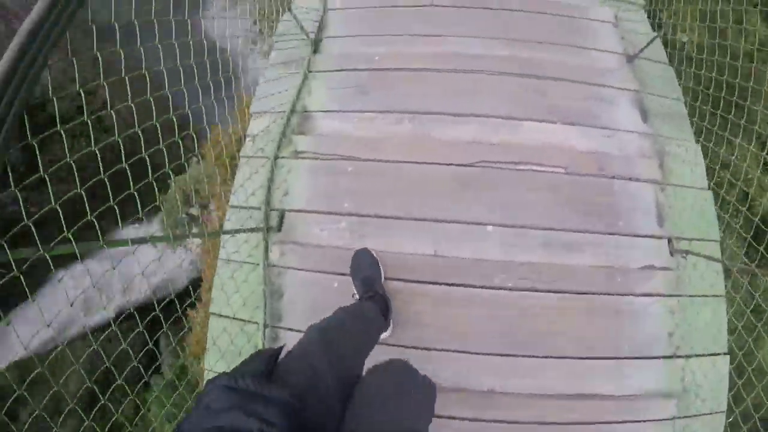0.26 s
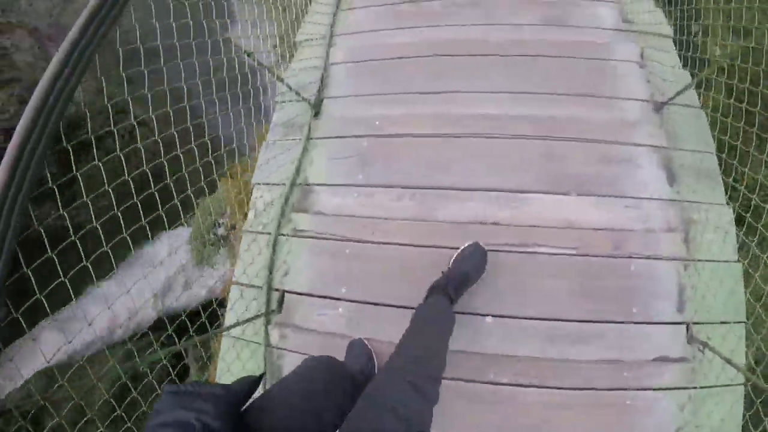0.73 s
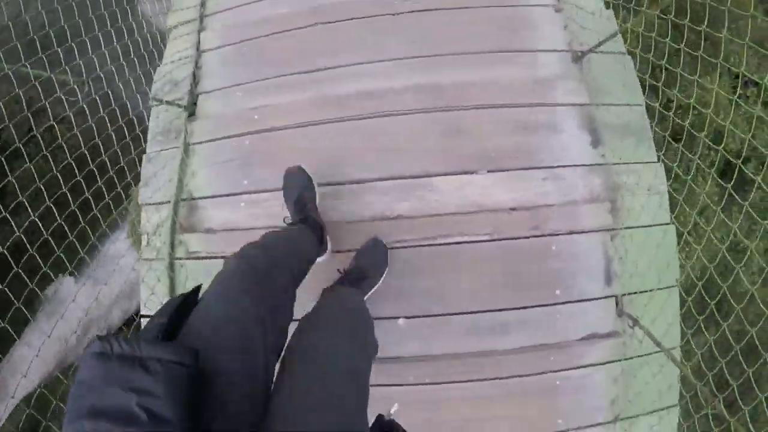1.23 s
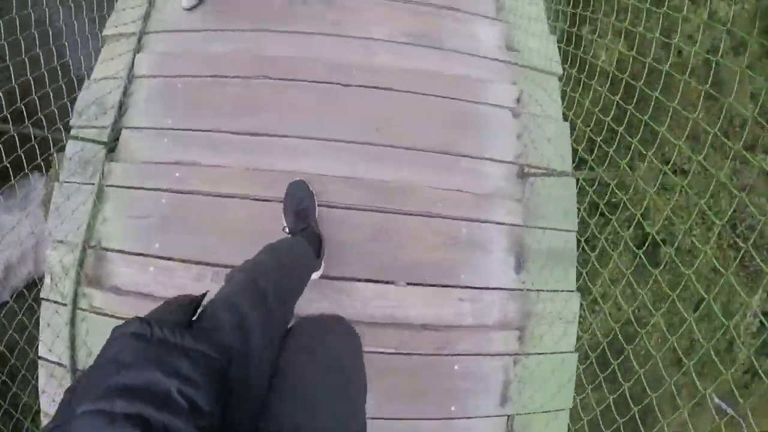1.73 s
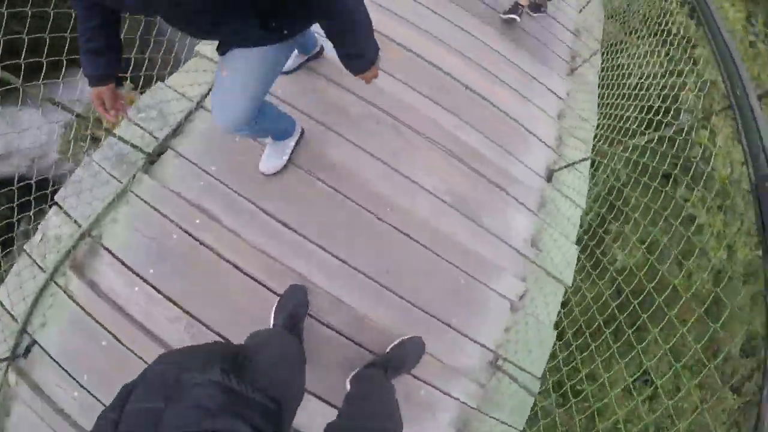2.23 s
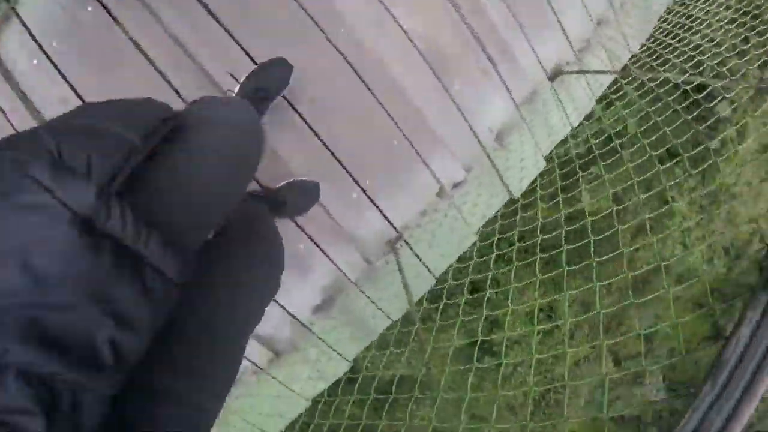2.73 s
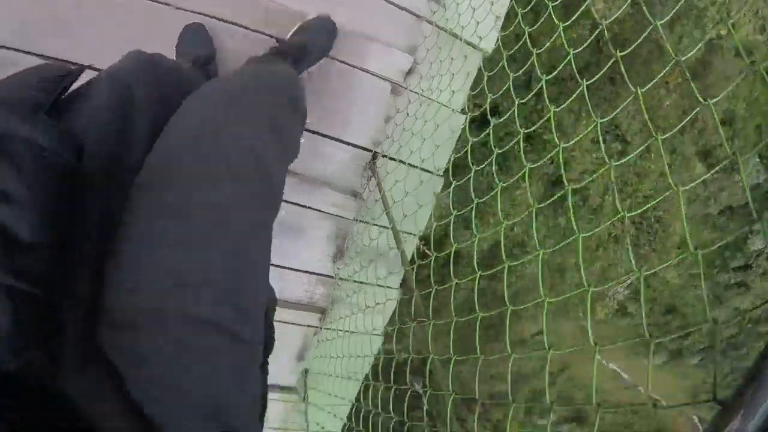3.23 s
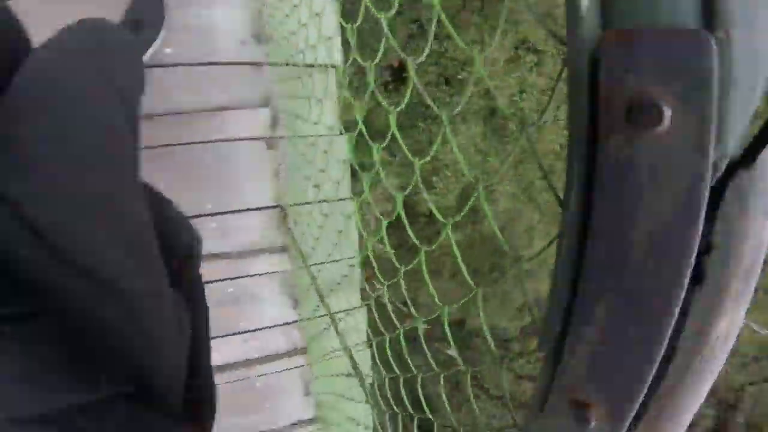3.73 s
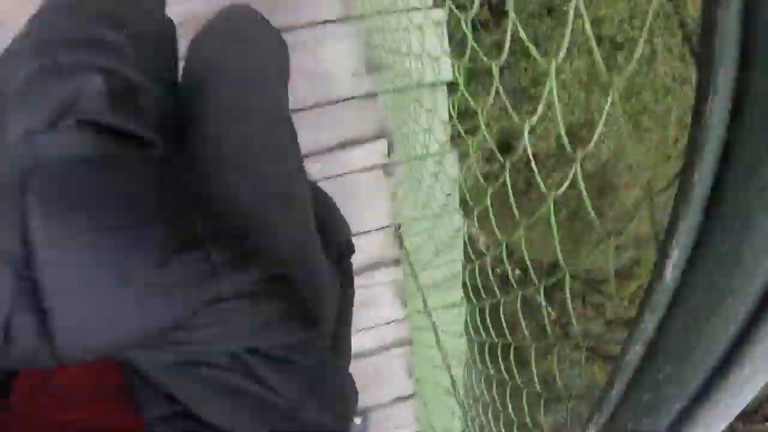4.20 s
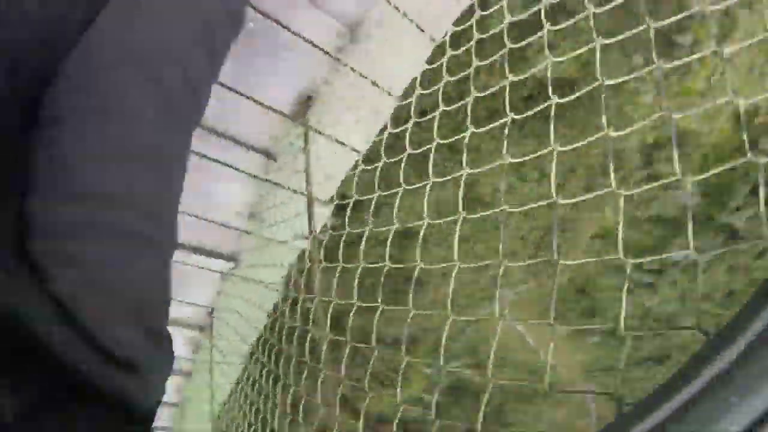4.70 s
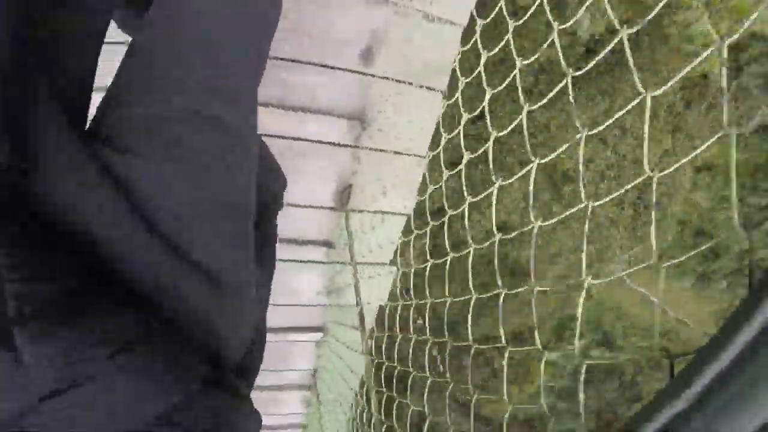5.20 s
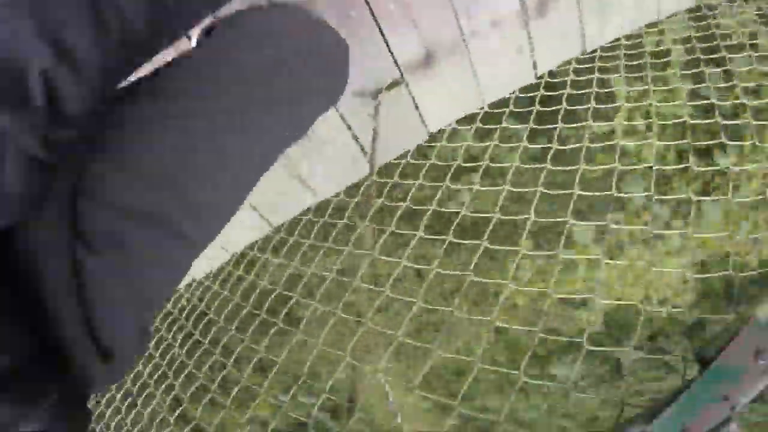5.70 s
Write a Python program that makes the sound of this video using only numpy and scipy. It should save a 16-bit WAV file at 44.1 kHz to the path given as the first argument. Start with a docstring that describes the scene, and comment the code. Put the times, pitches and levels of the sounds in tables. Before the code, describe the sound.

A mono, muffled perspective from inside a small sealed camera housing outdoors, high above a gorge. From 0 to 2 seconds there is only a soft, smooth, distant river rush with a boxy colour, over lumpy low wind and cloth rumble; a very faint tone slides upward at about 1.4. At 2.1 a dull bump begins the handling noise. Knocks gather from 2.2, and at 2.35 a loud plastic crack and heavy low thump overload the input, the background dipping afterwards. More clacks, thuds and short cloth scrapes follow until 2.9, then a bright, sharp knock at 3.35. After a sparser stretch, knocks resume at 3.8 to 4.0, with a huge, deep, slow-building thump near 4.4. Another hard clack and boom lands at 4.94, then a tiny rising squeak at 5.07. Low gusts, thuds and rattling knocks cluster from 5.4 to 5.7, with a strong bump at 5.65, and lighter taps end it.

```python
"""On a plank bridge high over a gorge, a small camera in a sealed housing swings against a padded jacket.
The far river and the wind reach the microphone through the housing, as coloured noise.
Bumps swing the housing at a few tens of hertz; knocks and dragging cloth ring its shell modes.
Faint tones slide upward, hard plastic parts snap, and the hardest bumps overload the input."""
import sys
import numpy as np
from scipy import signal
from scipy.io import wavfile
from scipy.ndimage import uniform_filter1d

SR = 44100
rng = np.random.default_rng(int(sys.argv[2]) if len(sys.argv) > 2 else 0)


def store_wav(level_fs):
    """Save 16-bit WAV to argv[1]."""
    pcm = np.round(np.clip(np.atleast_2d(level_fs), -1, 1) * 32767)
    wavfile.write(sys.argv[1], SR, pcm.T.astype(np.int16))


N = 262395  # samples


def gain_of(db):
    """Amplitude factor for a level in dB."""
    return 10 ** (np.asarray(db) / 20)


def evened(x):
    """Scale to an RMS of one."""
    return x / np.sqrt(np.mean(x ** 2) + 1e-20)


def read(points, hz):
    """Read a spectrum in dB, with straight lines over log frequency."""
    point_hz, point_db = np.transpose(points)
    return np.interp(np.log(hz + 1), np.log(point_hz + 1), point_db)


def along(curve):
    """Draw a curve of (seconds, value) points out over every sample."""
    s, value = np.transpose(curve)
    return np.interp(np.arange(N) / SR, s, value)


def add(mix, s, sound):
    """Lay a sound into the mix at s seconds, cut off at the end."""
    part = mix[round(s * SR):][:len(sound)]
    part += sound[:len(part)]


def noise(colour, size, patchy_db):
    """Random short-time spectra of a given colour, with drifting patches, at an RMS of one."""
    hz = np.fft.rfftfreq(size, 1 / SR)
    real, imaginary, patches = rng.standard_normal((4 * N // size + 5, len(hz), 3)).T
    patches = uniform_filter1d(patches, size=12, axis=0)  # smooth over frequency
    patches = evened(uniform_filter1d(patches, size=14, axis=1))  # smooth over time
    level_db = colour(hz)[:, None] + patchy_db * patches
    spectra = (real + 1j * imaginary) * gain_of(level_db)
    _, sound = signal.istft(spectra, nperseg=size, noverlap=3 * size // 4)
    return evened(sound[:N])


# The river as the camera turns and is covered by the jacket.
# Each point: time in seconds, level in dB.
RIVER_LEVEL = [(0, -46), (1.0, -46.5), (1.4, -47), (1.8, -48), (2.6, -47), (2.95, -46.5), (3.9, -50.5),
               (4.24, -49.5), (4.52, -46.5), (5.5, -48), (5.77, -45.5), (5.95, -47.5)]
# Colour of the distant rush. Each point: frequency in Hz, relative density in dB per Hz.
RUSH_COLOUR = [(59, -13.5), (100, 2.5), (314, -2.5), (385, -5), (855, -10.5), (1260, -10), (2060, -12.5),
               (2280, -5), (2530, -13), (3650, -10), (4050, -19), (5170, -23.5), (6090, -18), (7170, -27.5),
               (13200, -45)]
# Air resonances of the housing. Each row: centre in Hz, width in Hz, lift in dB.
HOUSING_RESONANCES = [(1249, 116, 5.5), (1890, 59, 4.5), (2120, 200, 1.5), (3780, 32, 10.5), (6066, 280, 6)]


def river():
    """Distant smooth rush, lifted at the air resonances of the housing."""
    def colour(hz):
        lift_db = sum(db / (1 + (2 * (hz - f) / width) ** 2) for f, width, db in HOUSING_RESONANCES)
        return read(RUSH_COLOUR, hz) + lift_db
    return gain_of(along(RIVER_LEVEL)) * noise(colour, size=1024, patchy_db=0.8)


# Wind and cloth rubbing on the housing.
# Each point: time in seconds, level in dB before the gusts.
RUMBLE_LEVEL = [(0.0, -35), (1.19, -38.5), (2.0, -32.5), (2.9, -33), (3.33, -42.5), (3.61, -40.5),
                (3.8, -27), (4.1, -38), (4.3, -29.5), (4.82, -27), (5.05, -39), (5.32, -39), (5.52, -23.5),
                (5.63, -41), (5.95, -22)]
# Colour of the rumble. Each point: frequency in Hz, relative density in dB per Hz.
RUMBLE_COLOUR = [(7, -27), (13, 4), (24, -5.5), (70, -12.5), (110, -29), (190, -36), (400, -89)]


def rumble():
    """Wind and rubbing cloth: lumpy low noise that comes in short gusts."""
    gusts = uniform_filter1d(rng.standard_normal(N), size=1500)
    gusts_db = 1.8 * evened(uniform_filter1d(gusts, size=1500))
    lumps = noise(lambda hz: read(RUMBLE_COLOUR, hz), size=8192, patchy_db=5.5)
    return gain_of(along(RUMBLE_LEVEL) + gusts_db) * lumps


# Faint rising tones. Each row: start in seconds, length in seconds, first Hz, last Hz,
# peak level in dB.
RISING_TONES = [(1.338, 0.189, 1135, 1300, -55.5), (5.07, 0.066, 3450, 3650, -49)]


def whistles():
    """Brief soft sine tones that slide upward, fading in and out."""
    out = np.zeros(N)
    for s, length_s, low_hz, high_hz, db in RISING_TONES:
        hz = np.linspace(low_hz, high_hz, round(length_s * SR))
        tone = np.sin(2 * np.pi * np.cumsum(hz) / SR)
        add(out, s, gain_of(db) * np.hanning(len(hz)) * tone)
    return out


def ring(modes, lift_db):
    """Answer of the modes to one softly rounded tap; neighbours start in opposite directions."""
    t = np.arange(3000) / SR
    tones = []
    for (hz, db, t60), lift in zip(modes, lift_db):
        tones.append(gain_of(db + lift - 60 * t / t60) * np.sin(2 * np.pi * hz * t))
    rounding = 1 - np.exp(-(t / 0.00031) ** 2)
    return (sum(tones[::2]) - sum(tones[1::2])) * rounding


# Knocks on the shell. Each row: time in seconds (contact begins 1 ms before it), peak of the
# bright modes in dB, peak of the deep modes in dB, lift of the lower deep modes in dB before
# that peak is set, decay time of the contact in ms.
SHELL_KNOCKS = [(2.1104, -51, -35.5, 8, 2.7), (2.2082, -23, -20, 16, 4), (2.2472, -31, -29, 8, 4.1),
                (2.296, -34.5, -34, 0, 4.2), (2.3494, -13, -16.5, 3.5, 2.15), (2.478, -34, -28, -9, 7.8),
                (2.4978, -40, -24.5, 1, 2.4), (2.5109, -19, -24.5, -24, 4.1), (2.749, -34, -27, 15, 1.4),
                (2.8412, -31, -35, -4, 3.3), (3.0063, -35, -60, 6, 3.6), (3.06, -56, -39, 0.5, 3.7),
                (3.2334, -48, -37.5, -2, 2), (3.3466, -14, -37.5, -5, 5), (3.3738, -21.5, -26, 8.5, 4.6),
                (3.7682, -37, -31.5, 0.5, 2.3), (3.7985, -27.5, -22.5, 13, 5.8),
                (3.9655, -36, -32, 0.5, 1.9), (3.9891, -47, -31, 9, 3.3), (4.292, -54, -33, 5.5, 3.3),
                (4.3186, -26.5, -34.5, 3, 2.2), (4.34, -38, -24, 0, 3.5), (4.385, -34, -29, 3, 3),
                (4.5007, -38, -31, -3.5, 8.1), (4.816, -36.5, -33.5, 12.5, 8), (4.8278, -27, -46, 0, 1.3),
                (4.9361, -23, -18, 4.5, 9.7), (5.364, -41, -34, -5, 3), (5.4241, -27, -62, 0, 3),
                (5.434, -41, -31.5, -1.5, 2), (5.5092, -49, -26.5, 9, 5.5), (5.6115, -35.5, -31, 8, 2.2),
                (5.6179, -47, -28, -0.5, 2.1), (5.64, -47, -29, 10, 3.3), (5.657, -36, -24, 4.5, 3.3),
                (5.8747, -40, -34, 8, 3.3), (5.9343, -39, -33, 14, 8.3)]
# Deep shell modes. Each row: frequency in Hz, relative level in dB, 60 dB decay in seconds.
DEEP_MODES = [(200, -10, 0.015), (314, 7, 0.018), (392, 2.5, 0.046), (442.3, 3, 0.13), (586, -5, 0.0086),
              (782, 1.5, 0.031)]
# Bright shell modes. Each row: frequency in Hz, relative level in dB, 60 dB decay in seconds.
BRIGHT_MODES = [(1225, -4, 0.025), (1483, -2.5, 0.015), (1683, -4.5, 0.013), (1910, -9, 0.014),
                (2208, 3, 0.0097), (2716, -10, 0.014), (2940, -7.5, 0.0088), (3310, 0.5, 0.0048),
                (3737, -4.5, 0.016), (4790, -13, 0.004), (6200, -39, 0.0064), (8000, -42.5, 0.0021)]
LOWER_HZ = 350  # the lower deep modes lie under this
PITCH_SPREAD = 0.02  # typical random share by which the deep modes' pitch varies from knock to knock
# Blunt knocks, with deep modes near or over the bright ones, lose treble:
# dB per octave for each dB, deep-over-bright dB where it starts, steepest tilt in dB per octave
DULL_PER_DB, BLUNT_FROM_DB, DULLEST_DB = -1.95, -5, -2.5


def knocks():
    """Each short gritty contact rings the same shell modes; blunt contacts favour the lower ones."""
    t, out = np.arange(1500) / SR, np.zeros(N)
    grits = rng.standard_normal((len(SHELL_KNOCKS), len(t)))
    shifts = 1 + PITCH_SPREAD * rng.standard_normal(len(SHELL_KNOCKS))
    octaves = np.log2(np.transpose(BRIGHT_MODES)[0] / 2000)
    is_lower = np.transpose(DEEP_MODES)[0] < LOWER_HZ
    for (s, bright_db, deep_db, low_db, ms), grit, shift in zip(SHELL_KNOCKS, grits, shifts):
        blunt_db = max(deep_db - bright_db - BLUNT_FROM_DB, 0)
        tilt_db = max(DULL_PER_DB * blunt_db, DULLEST_DB)
        contact = grit * (1 - np.exp(-(t / 0.00087) ** 2)) * np.exp(-t / (ms / 1000))
        bright = signal.fftconvolve(contact, ring(BRIGHT_MODES, tilt_db * octaves))
        # one quick shove, then the grit shakes the shell on
        push = abs(grit) * np.exp(-t / 0.00074) + 0.44 * contact
        varied_modes = np.multiply(DEEP_MODES, (shift, 1, 1))
        deep = signal.fftconvolve(push, ring(varied_modes, low_db * is_lower))
        add(out, s - 0.001, gain_of(bright_db) * bright / abs(bright).max())
        add(out, s - 0.001, gain_of(deep_db) * deep / abs(deep).max())
    return out


# Bumps of the housing. Each row: start in seconds, swing level in dB before rise and decay,
# direction of the first swing, settled frequency in Hz, rise in ms, 60 dB decay in seconds.
HOUSING_BUMPS = [(2.119, -24, -1, 72, 10, 0.2), (2.131, -14.5, -1, 48, 8.1, 0.11),
                 (2.207, -18, 1, 54, 5, 0.17), (2.343, 4, -1, 16.4, 2.42, .22),
                 (2.478, -16.5, 1, 56, 2, .5), (2.518, -9, -1, 19, 2.7, 0.074),
                 (2.551, -11, 1, 31, 3.6, 0.093), (2.767, -3, -1, 16.7, 8.4, 0.3),
                 (2.849, -19, 1, 58.5, 6.9, 0.23), (3.002, -25, 1, 60, 3.1, 0.24),
                 (3.104, -16, 1, 15.9, 20, 0.29), (3.359, -17, 1, 19, 4, 0.079),
                 (3.377, -15, 1, 46.4, 3.6, 0.18), (3.802, -23, -1, 60.5, 3.2, 0.33),
                 (3.993, -6, -1, 40.4, 5.7, 0.098), (4.024, -13.5, -1, 50, 4.9, 0.12),
                 (4.217, -15, -1, 26.7, 4.4, 0.17), (4.24, -3.5, 1, 10.7, 11, 0.21),
                 (4.365, 12, -1, 20, 24.7, 0.12), (4.579, -5.5, 1, 19, 6, 0.056),
                 (4.797, -26, 1, 33, 6.3, .25), (4.9403, 4.5, 1, 19.8, 2.95, .14),
                 (4.967, -10, 1, 46, 2.8, 0.1), (5.243, -23.5, 1, 46, 9.3, .3),
                 (5.459, -10.5, 1, 21.5, 9, 0.36), (5.512, -10, 1, 33.6, 6.4, 0.32),
                 (5.535, -7.5, 1, 37, 14, 0.21), (5.572, -13.5, 1, 42, 23, 0.48),
                 (5.606, -17, 1, 41, 3, 0.088), (5.649, 1, 1, 16, 5.2, .21)]
SETTLE_S = 0.0107  # time constant; every swing settles alike
# Bumps harder than SOFT_DB start quicker than they settle, the more so the more sudden their rise:
# extra Hz per dB at a 1 ms rise, divided by the rise in ms to the power SUDDEN
SOFT_DB, QUICKER_HZ_PER_DB, SUDDEN = -18.5, 4, 0.25


def bumps():
    """The housing swings on its mount; hard swings start quick and slow as the padding gives way."""
    t, out = np.arange(SR // 2) / SR, np.zeros(N)
    for s, db, direction, settled_hz, rise_ms, t60 in HOUSING_BUMPS:
        extra_hz = QUICKER_HZ_PER_DB * max(db - SOFT_DB, 0) / rise_ms ** SUDDEN
        hz = settled_hz + extra_hz * np.exp(-t / SETTLE_S)
        rise = 1 - np.exp(-(t / (rise_ms / 1000)) ** 2)
        decay = gain_of(db - 60 * (t / t60) ** 1.1)
        swing = np.sin(2 * np.pi * np.cumsum(hz) / SR)
        add(out, s, direction * rise * decay * swing)
    return out


# Cloth dragging over the shell. Each row: start in seconds, length in seconds,
# level in dB of the drag that feeds the shell.
CLOTH_SCRAPES = [(2.294, 0.11, -51.5), (2.49, 0.047, -40), (2.742, 0.022, -43), (2.848, .11, -50),
                 (3.188, .083, -48.5), (3.359, 0.017, -36.5), (3.763, 0.15, -54.5), (4.365, 0.022, -51),
                 (4.93, 0.017, -35), (4.953, 0.043, -41), (5.411, 0.051, -54), (5.63, 0.053, -45)]


def scrapes():
    """Dense uneven slips feed the bright shell modes for as long as the cloth drags."""
    drag = np.zeros(N)
    for s, length_s, db in CLOTH_SCRAPES:
        add(drag, s, gain_of(db) * signal.windows.tukey(round(length_s * SR), 0.5))
    uneven_db = evened(uniform_filter1d(rng.standard_normal(N), size=120))
    slips = evened(rng.standard_normal(N) * gain_of(uneven_db))
    shell = ring(BRIGHT_MODES, np.zeros(len(BRIGHT_MODES)))
    return signal.fftconvolve(drag * slips, shell / np.linalg.norm(shell))[:N]


# Hard plastic parts snap together. Each row: start in seconds, level in dB before rise and decay.
PLASTIC_SNAPS = [(2.348, -19), (4.935, -36), (5.657, -40)]
SNAP_T60_S = 0.01


def snaps():
    """Hard parts meet in very short cracks of noise, wide across 150 to 5500 Hz."""
    t, out = np.arange(1500) / SR, np.zeros(N)
    band = signal.butter(3, [150, 5500], "bandpass", fs=SR, output="sos")
    grits = rng.standard_normal((len(PLASTIC_SNAPS), len(t)))
    for (s, db), grit in zip(PLASTIC_SNAPS, grits):
        crack = evened(signal.sosfilt(band, grit))
        rise = 1 - np.exp(-t / 0.001)
        add(out, s, gain_of(db - 60 * t / SNAP_T60_S) * rise * crack)
    return out


def scene():
    """Everything that reaches the microphone inside the housing, as one channel."""
    mix = river() + rumble() + whistles() + knocks() + bumps() + scrapes() + snaps()
    return mix[None]


EDGE_HZ = 13520  # top of the band


def record(dry):
    """Gain control drops on an overload and creeps back; the input clips; then the band limit."""
    level_db = 20 * np.log10(abs(dry[0]) + 1e-9)
    fall_db = np.arange(N) * 7.8 / SR  # the held peak level falls this much, 7.8 dB a second
    held_db = np.maximum.accumulate(level_db + fall_db) - fall_db
    over_db = np.maximum(held_db + 2.0, 0)  # over a threshold of -2 dB
    lag = np.exp(-1 / (0.012 * SR))  # the gain follows with a 12 ms time constant
    cut_db = 1.86 * signal.lfilter([1 - lag], [1, -lag], over_db)
    ducked = dry / gain_of(cut_db)
    clipped = np.clip(ducked, -1, 1)
    band_limit = signal.firwin(1023, EDGE_HZ, window=("kaiser", 9), fs=SR)
    return signal.oaconvolve(clipped, band_limit[None], "same")


dry = scene()
out = record(dry)
store_wav(out)
```